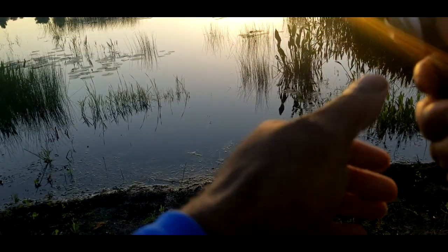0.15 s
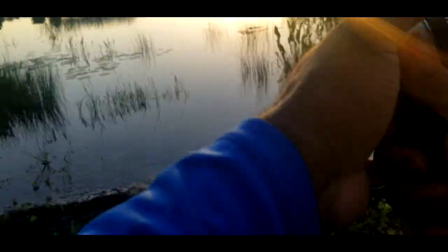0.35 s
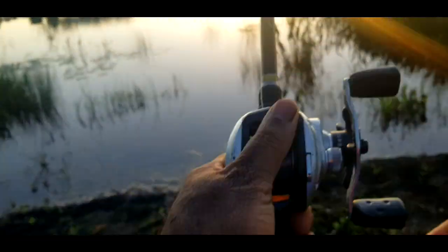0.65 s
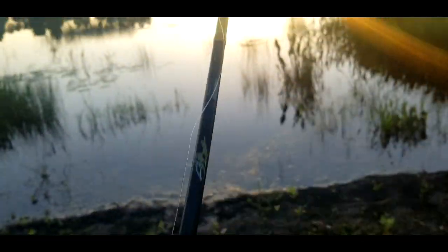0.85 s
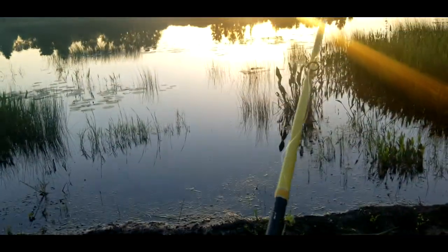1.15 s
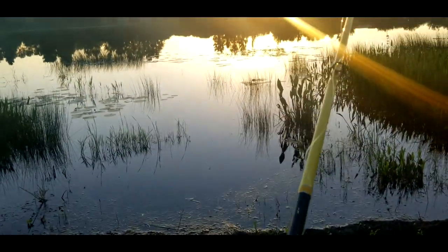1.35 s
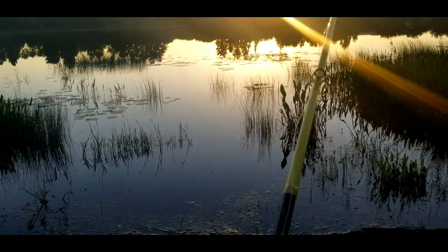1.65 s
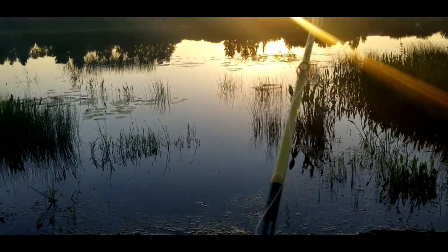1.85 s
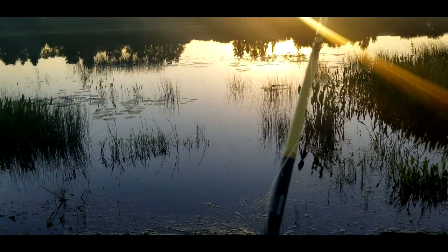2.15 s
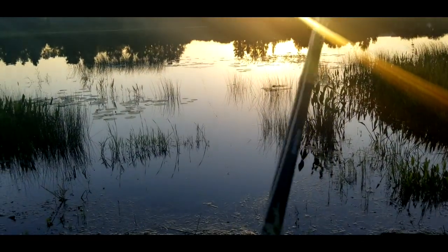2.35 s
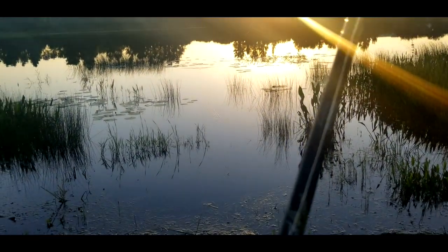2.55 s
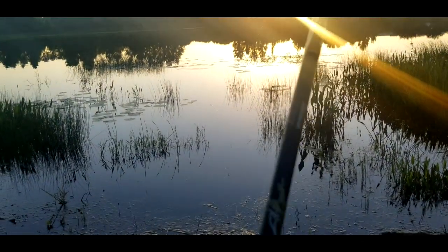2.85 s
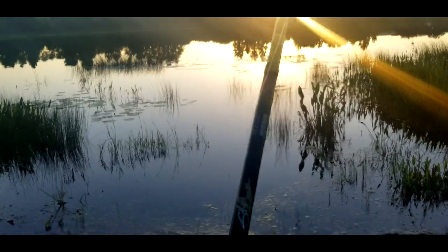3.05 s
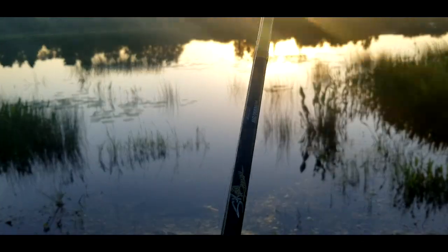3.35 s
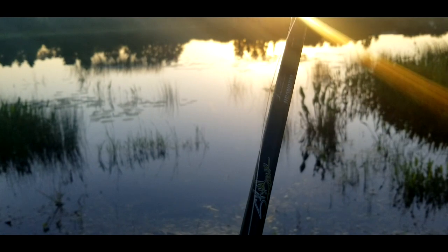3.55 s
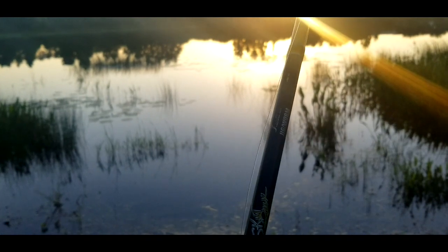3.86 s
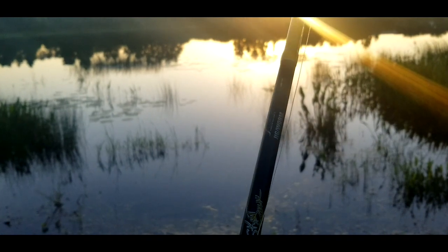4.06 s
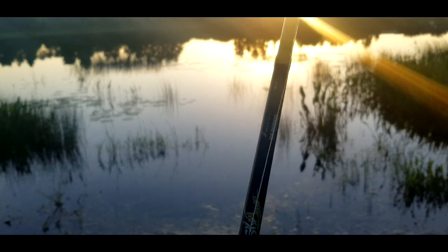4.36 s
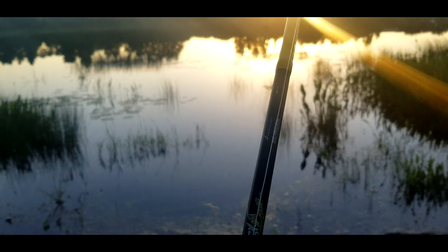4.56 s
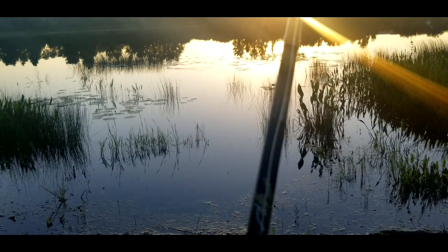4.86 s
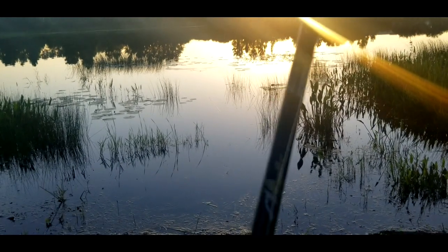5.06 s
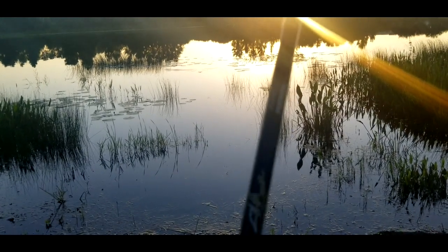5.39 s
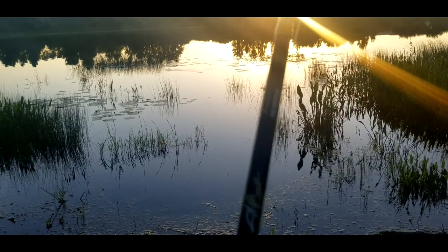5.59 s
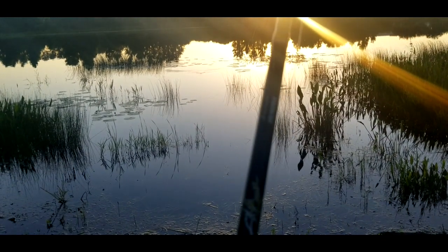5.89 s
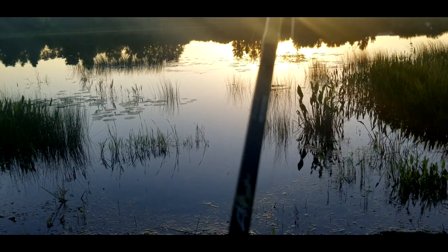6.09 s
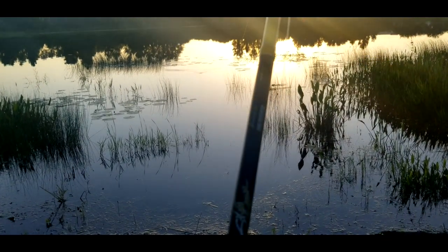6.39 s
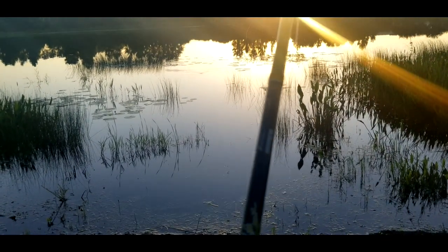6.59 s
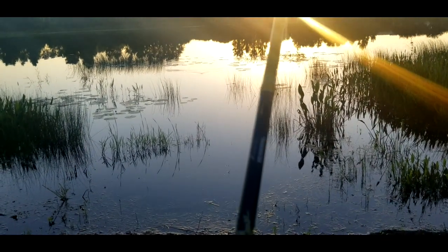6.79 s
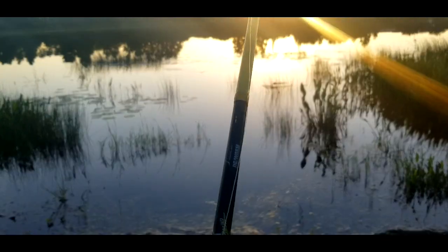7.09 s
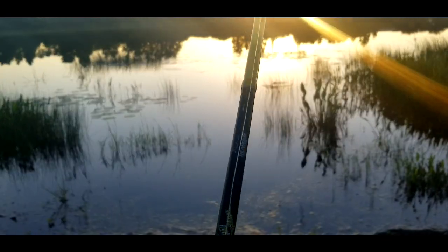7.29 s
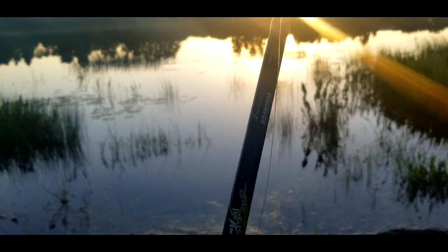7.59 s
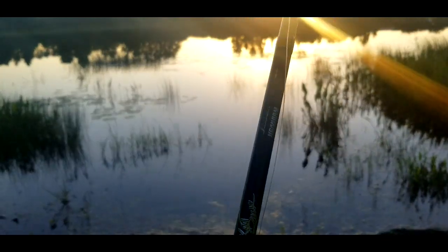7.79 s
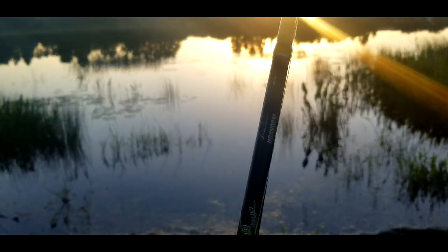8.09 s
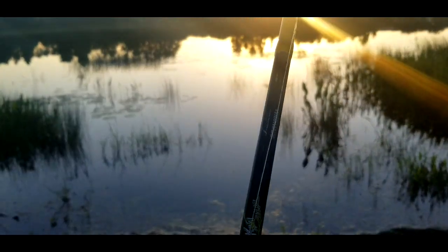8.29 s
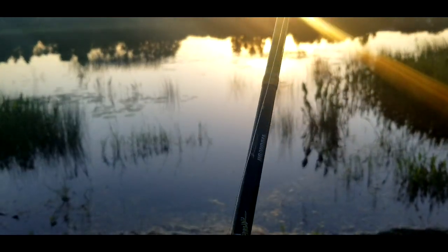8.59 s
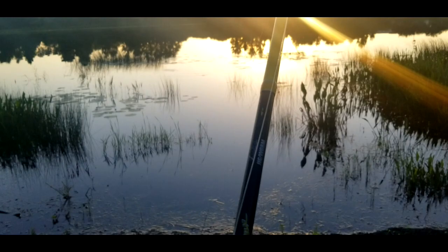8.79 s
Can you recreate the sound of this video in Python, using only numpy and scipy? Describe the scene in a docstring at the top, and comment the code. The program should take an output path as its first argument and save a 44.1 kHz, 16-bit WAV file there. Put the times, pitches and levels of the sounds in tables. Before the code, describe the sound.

Rapid silvery cricket trills over a distant chorus and faint low rumble, with brief sleeve rustle, tiny clicks and a loud hard reel snap early on.

```python
"""A near cricket repeats short trills at dusk by a pond: each wing stroke is a gliding tone with a reflection.
Another, lower cricket, a chorus, a thin whine, hiss and rumble lie behind it, made of pulsed tones and noise.
An angler takes hold of a reel, sleeve rubbing, and snaps it into gear close by: noise bursts and ringing modes.
The snap makes a gain control duck for about a second; near sounds are much weaker on the right."""
import sys
import numpy as np
from scipy import signal
from scipy.fft import rfft, irfft, next_fast_len
from scipy.io import wavfile
from scipy.ndimage import minimum_filter1d

SR = 44100
rng = np.random.default_rng(int(sys.argv[2]) if len(sys.argv) > 2 else 0)


def to_wav(s):
    """Save 16-bit WAV."""
    ch = np.atleast_2d(s).T  # columns
    pcm = np.round(np.clip(ch, -1, 1) * 32767)  # PCM
    wavfile.write(sys.argv[1], SR, pcm.astype(np.int16))


N = 394254
T = np.arange(N) / SR  # time, s
STROKES_PER_S = 80.3  # wing strokes within a trill, for both nearer crickets

# spectrum of the distant rumble: frequency_hz, relative_level_db
RUMBLE_SPECTRUM = [(20, -36), (35, -9), (58, 2.5), (90, 1), (120, -1), (170, -3), (330, -3.5), (520, -5.5),
                   (760, -15.5), (1050, -14.5), (1300, -22), (1600, -20.5), (2100, -47.5), (4000, -88.5)]


def undb(db):
    """Amplitude ratio: 20 decibels are a factor of ten."""
    return 10 ** (np.asarray(db) / 20)


def unit(x):
    """Normalization to an rms amplitude of 1."""
    return x / np.sqrt(np.mean(x ** 2))


def curves(table):
    """Linear interpolation in time of every column after the first."""
    s, *columns = np.transpose(table)
    return [np.interp(T, s, c) for c in columns]


def colour(x, points):
    """Linear filtering: the spectrum is multiplied by a gain in dB, interpolated over log frequency."""
    hz, db = np.transpose(points)
    size = next_fast_len(N + 4096)
    f = np.maximum(np.fft.rfftfreq(size, 1 / SR), 1)
    gain = undb(np.interp(np.log(f), np.log(hz), db))
    return irfft(rfft(x, size) * gain, size)[..., :N]


def noise(points):
    """Coloured noise: white noise shaped by a spectrum, at rms 1."""
    return unit(colour(rng.standard_normal(N), points))


def walk(rate):
    """Slow random modulation: random values, rate per second, joined by lines and scaled to rms 1."""
    knots = rng.standard_normal(16384)
    return unit(np.interp(T * rate, np.arange(len(knots)), knots))


def narrow(hz, width_hz):
    """Narrow-band noise: two random envelopes modulate carriers in quadrature at a moving pitch."""
    phase = 2 * np.pi * np.cumsum(hz) / SR
    return unit(walk(width_hz) * np.cos(phase) + walk(width_hz) * np.sin(phase))


def add(out, s, x):
    """Superposition: x is summed into out from time s on."""
    i = int(round(s * SR))
    x = x[max(-i, 0):max(N - i, 0)]
    out[max(i, 0):max(i, 0) + len(x)] += x


def scatter(x, t60):
    """Diffuse reflection from reeds, bank and water: convolution with exponentially decaying noise."""
    t = T[:SR // 2]
    decay = np.exp(-np.log(1000) * t / t60)
    build_up = np.minimum(t / 0.0045, 1)
    tail = rng.standard_normal(len(t)) * decay * build_up
    return signal.fftconvolve(x, tail / np.linalg.norm(tail))[:N]


def swell(s, rise_s, fall_s):
    """Exponential growth and relaxation of pressure, reaching 1 at time s."""
    return np.exp(-np.maximum((s - T) / rise_s, (T - s) / fall_s))


def wing_stroke(hz, turns, length_s, fall_hz, rasp, overtone_db):
    """Stridulation: a scraper runs along a toothed file, its tone swelling and gliding down as the wing slows."""
    u = np.arange(int(length_s * SR)) / int(length_s * SR)
    # uneven teeth disturb the phase
    teeth = np.interp(u, np.linspace(0, 1, num=12), rng.standard_normal(size=12))
    pitch = hz + fall_hz * (.4 - u ** 2)
    phase = 2 * np.pi * (turns + np.cumsum(pitch) / SR) + rasp * teeth
    envelope = np.sin(np.pi * u ** 1.2)
    return envelope * (np.sin(phase) + undb(overtone_db) * np.sin(2 * phase))


def air():
    """Broadband background: far rumble with a faint hum, a soft rustle, a steady hiss and a late midrange hiss."""
    # level of the swelling, receding rumble: time_s, level_db
    rumble_levels = [(0, -53.5), (3.9, -51), (6.2, -51.5), (8.94, -55)]
    # level of the rustle: time_s, level_db
    rustle_levels = [(0, -73.5), (1.6, -64), (2.0, -66.5), (2.62, -69.5), (2.85, -67), (8.94, -68)]
    # level of the midrange hiss that comes up late: time_s, level_db
    late_levels = [(0, -91.5), (6.3, -84.5), (7.2, -64), (7.7, -70), (8.94, -67)]
    # spectra of the rustle, the steady hiss and the late hiss: frequency_hz, relative_level_db
    rustle_spectrum = [(600, -5.5), (1400, 1.5), (2100, -11), (2900, 1), (3600, 3), (4200, 0.5), (4700, -4),
                       (7000, -41)]
    hiss_spectrum = [(500, -15), (2000, -1.5), (4600, -19), (6500, -11), (7600, -34), (9200, -11.5),
                     (11200, -4), (12200, 1.5), (13900, 1.5), (14800, -8.5), (16000, -2)]
    late_spectrum = [(700, -1), (1300, 4.5), (1800, 0), (2400, 3), (3000, 1), (4500, -39.5)]
    rumble_db, = curves(rumble_levels)
    rustle_db, = curves(rustle_levels)
    late_db, = curves(late_levels)
    rumble = noise(RUMBLE_SPECTRUM) * undb(rumble_db + .5 * walk(9))
    hum = undb(-62.5) * narrow(np.full(N, 119.), width_hz=10)
    rustle = noise(rustle_spectrum) * undb(rustle_db + walk(2.1))
    hiss = undb(-66.0) * noise(hiss_spectrum)
    late_hiss = noise(late_spectrum) * undb(late_db)
    return rumble + hum + rustle + hiss + late_hiss


def whine():
    """Narrow-band insect tone: a thin, very high band that mostly creeps upward."""
    # path of the whine: time_s, pitch_hz
    whine_path = [(0, 12070), (3.2, 12900), (5.2, 13100), (6.2, 13750), (7.6, 14400), (8.94, 14200)]
    hz, = curves(whine_path)
    return narrow(hz, width_hz=480) * undb(-72 + .8 * walk(1.4))


def chorus():
    """Incoherent sum of further crickets, each with its own pitch and pace, smeared by diffuse reflection."""
    # further crickets: pitch_hz, strokes_per_s, trills_per_s, relative_level_db
    singers = [(5380, 76, 6.3, -67), (5620, 74, 3.7, -66.5), (5740, 68, 1.9, -62), (5850, 79, 5.1, -60.5),
               (5970, 65, 1.9, -63.5), (5900, 120, 7.3, -68), (6500, 84, 4.6, -67), (6620, 75, 3.1, -72)]
    # spectrum of the most distant, blurred crickets: frequency_hz, relative_level_db
    far_spectrum = [(4500, -35.5), (5000, -19), (5350, -13.5), (5850, -4), (6150, 4), (6400, -11),
                    (6750, -14.5), (7050, -39), (7500, -66)]
    song = np.zeros(N)
    for hz, rate, pace, db in singers:
        stroke = (np.cumsum(rate * (1 + 0.027 * walk(5))) / SR) % 1  # position within the stroke, 0 to 1
        trill_turns = rng.random() + np.cumsum(pace * (1 + .2 * walk(2))) / SR
        trill = np.sin(2 * np.pi * trill_turns)
        pitch = hz + 260 * (.5 - stroke) + 60 * walk(60)
        wings = np.sin(np.pi * stroke) ** 2 * np.sin(2 * np.pi * np.cumsum(pitch) / SR)
        song += undb(db) * unit(wings * np.clip(.6 + .5 * trill, .35, 1))
    far_left = undb(-53.5) * noise(far_spectrum) * undb(walk(16))
    left = .7 * song + .62 * scatter(song, t60=.2) + far_left
    right = undb(-26) * scatter(song, t60=0.1486) + undb(-64.0) * noise(far_spectrum)
    return np.array([left, right])


def second_cricket():
    """Stridulation with uneven teeth: a lower, raspier neighbour further left, its strokes blurred by reeds."""
    # trills, about four a second: start_s, relative_level_db
    low_trills = [(.08, -45), (.3, -43), (.53, -47), (.75, -45), (.96, -55), (1.19, -46), (1.39, -54.5),
                  (1.66, -47), (1.87, -55), (2.06, -62), (2.29, -63.5), (2.68, -59), (2.92, -56.5),
                  (3.11, -46), (3.36, -62), (3.61, -50), (3.88, -52), (4.16, -55), (4.41, -54), (4.66, -64),
                  (4.91, -49), (5.17, -53), (5.38, -55), (5.67, -55), (5.94, -49), (6.2, -47), (6.44, -60),
                  (6.68, -52), (6.95, -54), (7.25, -55), (7.5, -68), (7.75, -55), (8.04, -46), (8.36, -47),
                  (8.59, -51), (8.83, -58.5)]
    song_hz, trill_s = 5470, .16
    song = np.zeros(N)
    for start, db in low_trills:
        for k in range(round(trill_s * STROKES_PER_S)):
            own = rng.standard_normal(size=3)  # deviations of pitch, phase and level
            stroke = wing_stroke(song_hz + 90 * own[0], own[1], length_s=.007, fall_hz=260,
                                 rasp=.3, overtone_db=-37.5)
            add(song, start + k / STROKES_PER_S, stroke * undb(db + 2 * own[2]))
    left = song + undb(-0.5) * scatter(song, t60=.1)
    right = undb(-33.5) * scatter(song, t60=.1)
    return np.array([left, right]) * undb(-5)


def handling():
    """Stick-slip friction: cloth slips in small grains; a hollow rub rises in pitch as it presses harder."""
    # brushes of the sleeve past the rod: peak_s, rise_s, fall_s, level_db
    brushes = [(.09, .06, 0.044, -60), (.455, 0.072, 0.019, -54), (.83, 0.16, 0.1, -58),
               (1.25, 0.38, 0.17, -60)]
    # faint hollow rubs: peak_s, rise_s, fall_s, level_db, pitch_lift_hz
    rubs = [(0.131, 0.062, 0.089, -56, 100), (0.299, .06, .07, -72, 70), (.56, .3, 0.036, -68, 34),
            (1.1, .14, .06, -65.5, 14), (1.42, .3, .035, -55.5, 170)]
    # spectrum of the brushing cloth: frequency_hz, relative_level_db
    sleeve_spectrum = [(400, -13.5), (1000, -20), (1650, 9), (2200, -1.5), (3500, 11.5), (4800, 5.5),
                       (6500, -4), (8500, -15), (12000, -6), (16000, -25.5)]
    brushing = sum(undb(db) * swell(s, rise, fall) for s, rise, fall, db in brushes)
    grains = rng.standard_normal(N) * undb(2.3 * walk(700))
    cloth = unit(colour(grains, sleeve_spectrum)) * brushing
    rubbing = sum(undb(db) * swell(s, rise, fall) for s, rise, fall, db, _ in rubs)
    # resonance under the lightest touch, 1110 Hz, raised by pressure
    hz = 1110 + sum(lift * swell(s, rise, fall) for s, rise, fall, _, lift in rubs)
    hollow_rub = narrow(hz, width_hz=310) * rubbing * undb(2.2 * walk(30))
    return cloth + hollow_rub


def scrapes():
    """Stick-slip friction: the palm's skin catches and slips on the housing in short, coarse bursts."""
    # scrapes of the palm as it takes hold: peak_s, rise_s, fall_s, level_db
    bursts = [(.425, .006, .006, -48), (0.431, 0.0011, 0.0019, -29.5), (.444, .004, .009, -48),
              (.459, .004, .005, -49)]
    # spectrum of the scrapes: frequency_hz, relative_level_db
    scrape_spectrum = [(300, -14), (900, -17), (1600, 5.5), (2400, -3), (3300, -5), (4600, 6.5),
                       (5800, 9.5), (8500, -23), (12500, -7), (14000, -28), (16000, -34)]
    pressure = sum(undb(db) * swell(s, rise, fall) for s, rise, fall, db in bursts)
    grains = rng.standard_normal(N) * undb(3.1 * walk(1100))
    return unit(colour(grains, scrape_spectrum)) * pressure


def squeak(s, hz, length_s, db):
    """Frequency glide: one tiny falling squeak as the hand closes on the reel."""
    out, u = np.zeros(N), np.linspace(0, 1, int(length_s * SR))
    tone = np.sin(2 * np.pi * np.cumsum(hz * (1 - 0.086 * u)) / SR)
    add(out, s, undb(db) * np.sin(np.pi * u) * tone)
    return out


def contacts():
    """Inelastic rebound: the pawl bounces after a firm click, each bounce later, softer and duller."""
    # clicks of the reel: start_s, relative_level_db, treble_db_per_octave, bounces (rounded to whole ones)
    clicks = [(.3886, -43, -9, 1.5), (0.4323, -28.5, -7, 2), (0.4423, -43, 5, -0.5), (0.63, -41, 2.5, 3),
              (1.2746, -33, -9, 0.73), (1.3655, -42.5, -20, 0), (1.451, -45, -16, 0),
              (1.5807, -23, -1, 0.5), (1.588, -32, -8, 0), (1.6005, -17, 6, 0), (1.602, 0.5, -0.5, 3.5),
              (1.614, -19, -8, 1.5), (1.723, -44, -14, 6)]
    gap_s, spread = .0013, 1.4  # delay of the first bounce; a power above 1 widens the later gaps
    first_bounce_db, bounce_db, bounce_treble_db = -9.5, -3.5, -4.5  # first loss, later losses, dulling
    for s, db, treble_db, bounces in clicks:
        yield s, db, treble_db
        for k in range(1, round(bounces) + 1):
            bounce_level_db = db + first_bounce_db + bounce_db * (k - 1)
            yield s + gap_s * k ** spread, bounce_level_db, treble_db + bounce_treble_db * k


def reel():
    """Modal excitation: each catch of the pawl cracks and rings the small metal housing."""
    # modes of the housing: frequency_hz, relative_level_db, t60_s
    modes = [(1107, -30.5, 0.0592), (1614, -15, 0.031), (2140, -10, .025), (2827, -2, 0.02),
             (3000, 0, 0.015), (3870, -2, 0.024), (4243, 1, 0.021), (5040, -19.5, .016), (5470, 8, 0.0083),
             (5650, 11, 0.0082), (5460, -8.5, 0.0061), (6680, 0.5, 0.01), (7550, -17.5, 0.0084),
             (8920, -9.5, 0.012), (9240, -12.5, 0.019), (10730, -9, 0.022), (10850, -13, 0.0083),
             (12290, -20.5, 0.02)]
    # spectrum of the crack: frequency_hz, relative_level_db
    crack_spectrum = [(100, -14.5), (400, -12.5), (750, -21.5), (1300, -11), (2200, -5), (3300, -3.5),
                      (6000, -1.5), (8000, -12.5), (12000, -6), (16000, -26)]
    out, t = np.zeros(N), T[:SR // 12]
    grit = noise(crack_spectrum)
    octaves = np.log2(np.maximum(np.fft.rfftfreq(len(t), 1 / SR), 3000) / 3000)
    contact = 1 - np.exp(-t / 0.00077)  # the force takes a moment to build
    for s, db, treble_db in contacts():
        ring = np.zeros(len(t))
        for hz, mode_db, t60 in modes:
            mode_gain = undb(mode_db + treble_db * np.log2(hz / 3000))
            ring += mode_gain * np.cos(2 * np.pi * hz * t) * np.exp(-np.log(1000) * t / t60)
        ring /= np.abs(ring * contact).max()
        i = rng.integers(N - len(t))
        tilted_grit = irfft(rfft(grit[i:i + len(t)]) * undb(treble_db * octaves), len(t))
        crack = tilted_grit * np.exp(-t / 0.0024)
        add(out, s, undb(db) * contact * (undb(-4.6) * ring + undb(-7.5) * crack))
    # bank and reeds return a faint wash whose energy decays by 60 dB in .23 s
    keep = np.exp(-np.log(10 ** 6) / (.23 * SR))
    energy = signal.lfilter([1 - keep], [1, -keep], out ** 2 + 1e-18)
    wash = np.sqrt(energy) * grit
    small_body = signal.butter(2, 250, "high", fs=SR, output="sos")  # too small to radiate bass
    return signal.sosfilt(small_body, out) + undb(-21.5) * wash


def near_cricket():
    """Phase-coherent stridulation: strokes nearly keep one running phase; a reflection follows on the left."""
    # trills, about five a second with a few hesitations: start_s, wing_strokes, relative_level_db
    trills = [(0.015, 7, -52.5), (0.194, 8, -51.5), (0.377, 8, -52.5), (0.555, 9, -50.5), (0.761, 8, -50),
              (0.945, 8, -49), (1.129, 8, -47), (1.316, 9, -47), (1.48, 9, -47.5), (1.689, 9, -47.5),
              (1.886, 10, -49), (2.1, 9, -50), (2.292, 9, -47.5), (2.481, 8, -48), (2.665, 10, -54.5),
              (2.865, 8, -51), (3.052, 9, -48), (3.252, 9, -48.5), (3.447, 7, -49.5), (3.627, 10, -50.5),
              (3.831, 9, -49), (4.041, 10, -50), (4.252, 10, -51.5), (4.443, 9, -49.5), (4.642, 9, -49.5),
              (4.841, 8, -49.5), (5.028, 10, -50), (5.21, 8, -51), (5.385, 8, -49.5), (5.557, 10, -53.5),
              (5.752, 10, -50), (5.979, 10, -46.5), (6.166, 10, -48), (6.391, 10, -50), (6.639, 9, -49.5),
              (6.836, 8, -47), (7.014, 9, -47), (7.222, 9, -48.5), (7.415, 9, -49), (7.594, 7, -47.5),
              (7.797, 9, -50), (7.994, 8, -47.5), (8.402, 9, -45.5), (8.614, 10, -48), (8.814, 8, -48)]
    song_hz, song_scatter_hz = 6013, 14  # pitch of the wings; spread from trill to trill
    soft_start_db = 2  # how much softer a trill begins
    direct, echo = np.zeros(N), np.zeros(N)
    for start, strokes, db in trills:
        hz = song_hz + song_scatter_hz * rng.standard_normal()
        # cycles between song and reflection: the path hardly changes
        bounce_turns = .76 + .06 * rng.standard_normal()
        for k in range(round(strokes)):
            own = rng.standard_normal(size=5)  # deviations of time, both levels and both phases
            s = start + k / STROKES_PER_S + .00012 * own[0]
            turns = hz * s + .07 * own[3]
            size = undb(db - soft_start_db * np.exp(-k / 1.7))
            stroke = wing_stroke(hz, turns, length_s=.0092, fall_hz=220, rasp=.08, overtone_db=-35)
            add(direct, s, stroke * size * undb(own[1]))
            echo_turns = turns + bounce_turns + .12 * own[4]
            bounce = wing_stroke(hz - 20, echo_turns, length_s=.0054, fall_hz=220,
                                 rasp=.12, overtone_db=-35)
            add(echo, s + .0036, bounce * size * undb(1.4 * own[2]))
    left = undb(4) * direct + echo + undb(-8) * scatter(direct, t60=.06)
    right = undb(-3.2) * direct + undb(-17) * scatter(direct, t60=.08)
    return np.array([left, right])


def scene():
    """Superposition of all sources on two uneven microphones, each with its own faint hiss."""
    # gain of near sounds at the right microphone: frequency_hz, gain_db
    right_port = [(50, -9), (120, -11.5), (300, -17.5), (1200, -22.5), (2400, -17.5), (4400, -27),
                  (8000, -20), (15000, -10.5)]
    # loss of the reel's clicks at the right microphone: frequency_hz, loss_db
    click_shadow = [(60, 12.5), (110, 11.5), (200, 14), (380, 12), (700, 10.5), (1290, 13), (2380, 17),
                    (4400, 27), (8120, 13), (15000, 8.5)]
    hand_squeak = squeak(s=.628, hz=2720, length_s=0.045, db=-60)
    near = air() + whine() + handling() + scrapes() + hand_squeak
    clicks = reel()
    shadow_gain = [(hz, -loss_db) for hz, loss_db in click_shadow]
    shaded = colour(near, right_port) + colour(clicks, shadow_gain)
    # these sounds reach the right microphone one sample later
    right = np.roll(shaded, 1) + undb(-70.5) * noise(RUMBLE_SPECTRUM)
    own_hiss = undb(-76) * rng.standard_normal((2, N)) * np.array([[.4], [1]])
    crickets = chorus() + second_cricket() + near_cricket()
    return np.array([near + clicks, right]) + crickets + own_hiss


def gain_control(x, threshold_db, most_db, hold_s, fall_s, rise_s):
    """Dynamic range compression: a loud peak turns the gain down; it is held, then creeps back."""
    level_db = 20 * np.log10(np.abs(x).max(axis=0) + 1e-9)
    over_db = np.clip(level_db - threshold_db, 0, most_db)
    size = int(hold_s * SR) | 1
    # the deepest cut asked for within the past hold time
    held_db = minimum_filter1d(-over_db, size, origin=size // 2, mode="constant")
    fall, rise = (signal.lfilter([1 / (s * SR)], [1, 1 / (s * SR) - 1], held_db) for s in (fall_s, rise_s))
    return x * undb(np.minimum(fall, rise))


def record(dry):
    """Compression and band limiting: both channels duck after a loud peak and lose the top treble."""
    ducked = gain_control(dry, threshold_db=-19.5, most_db=8.5, hold_s=1.015, fall_s=0.229, rise_s=0.23)
    top_hz = 15700
    low_pass = signal.ellip(10, .2, 70, top_hz, fs=SR, output="sos")
    return signal.sosfilt(low_pass, np.clip(ducked, -1, 1))


dry = scene()
out = record(dry)
to_wav(out)
```